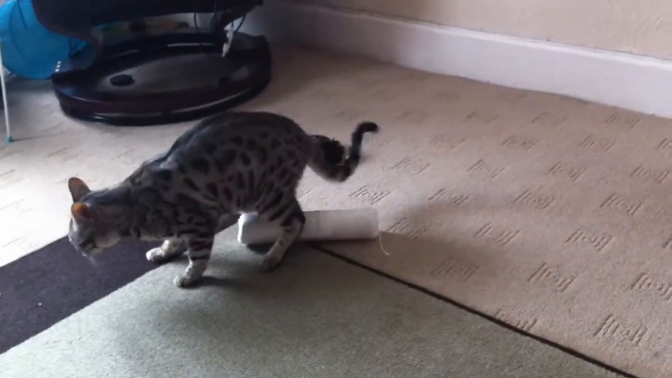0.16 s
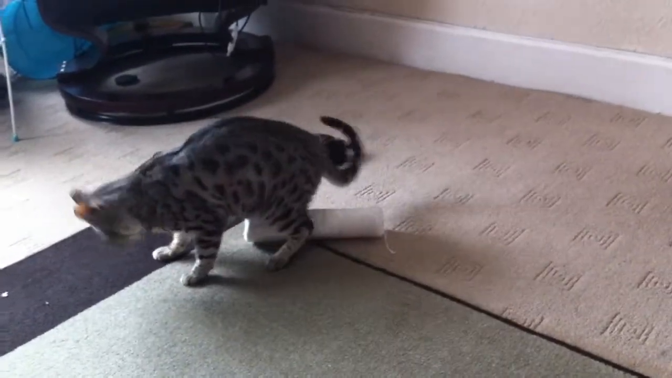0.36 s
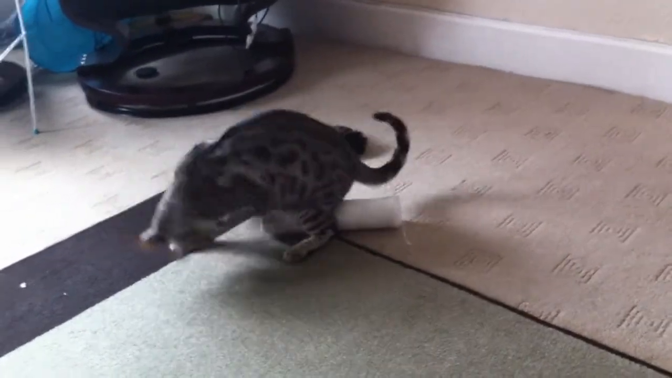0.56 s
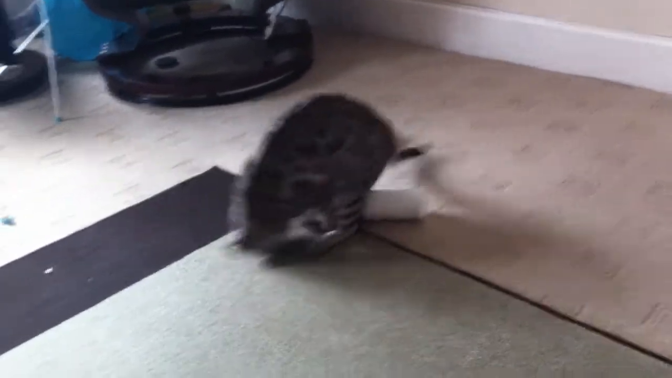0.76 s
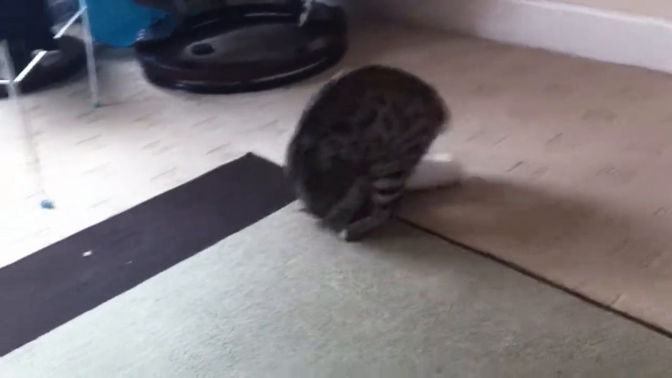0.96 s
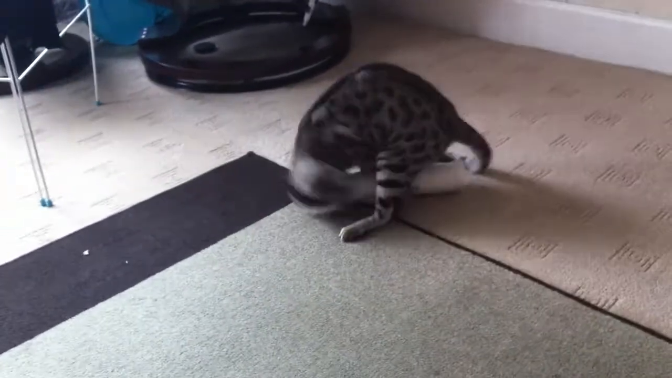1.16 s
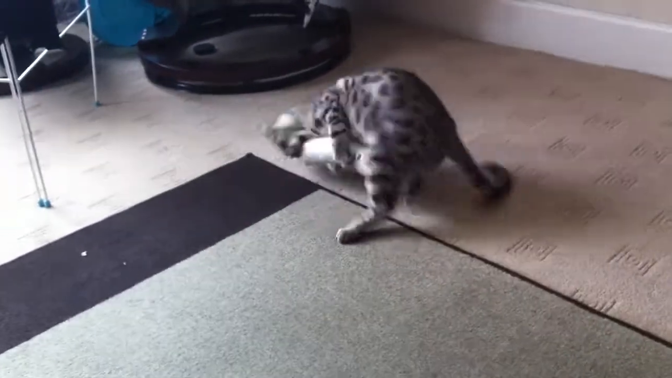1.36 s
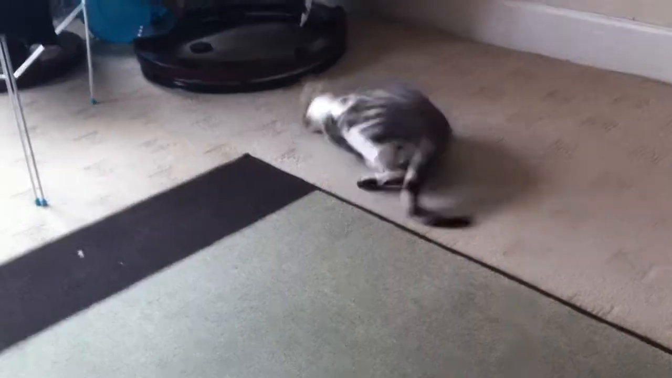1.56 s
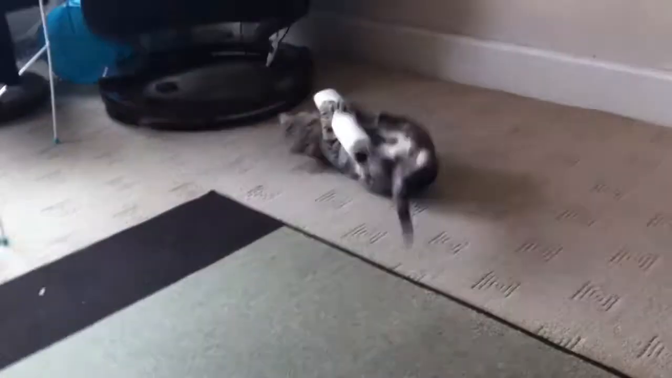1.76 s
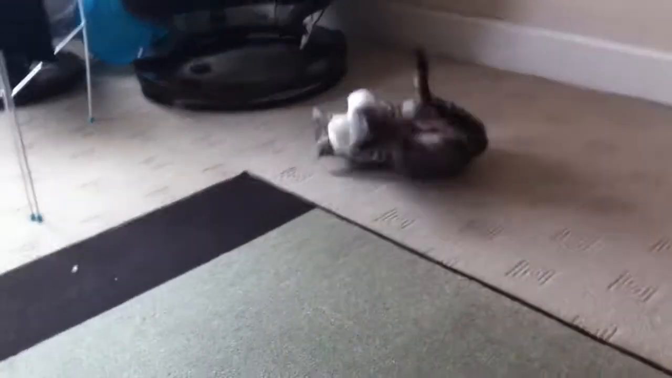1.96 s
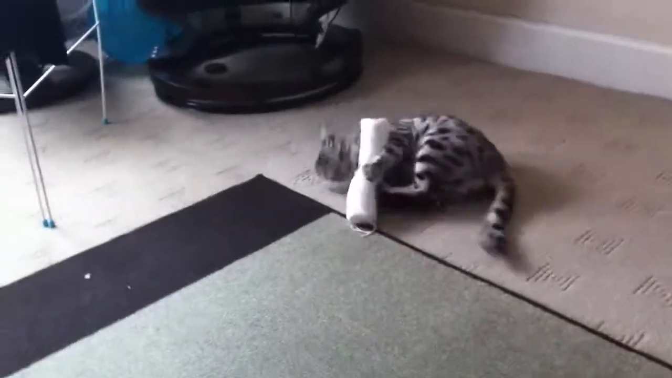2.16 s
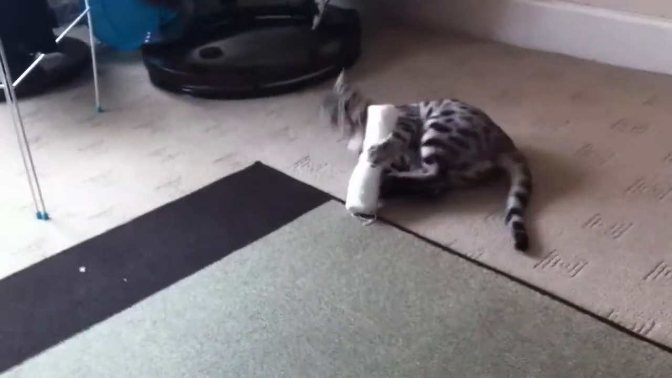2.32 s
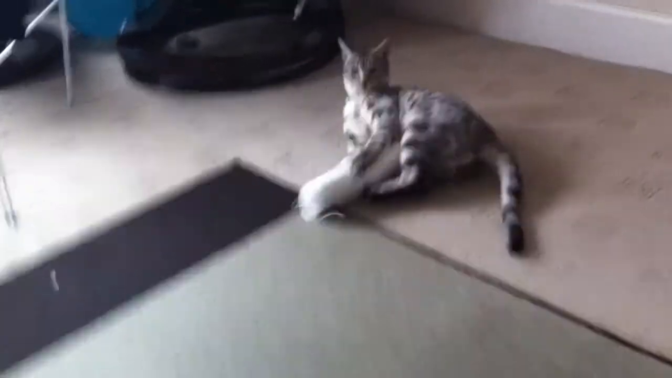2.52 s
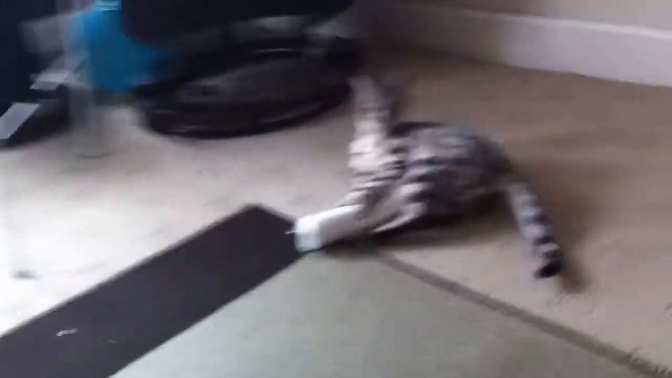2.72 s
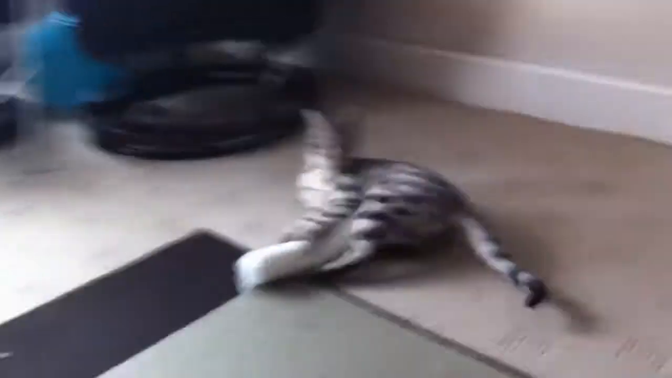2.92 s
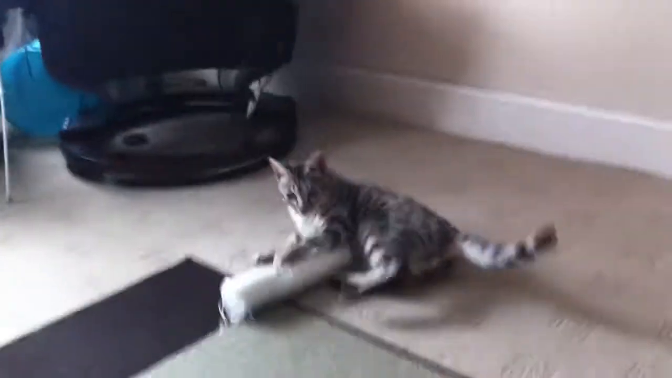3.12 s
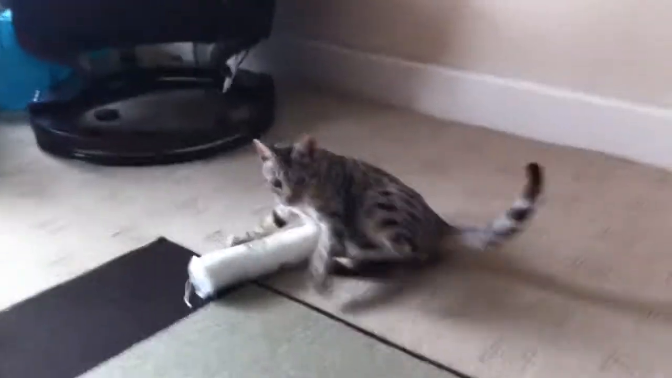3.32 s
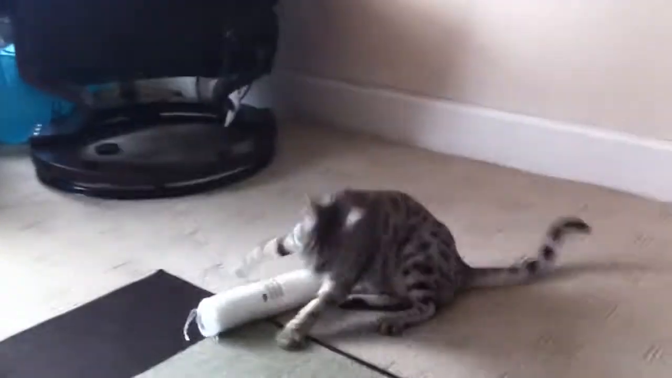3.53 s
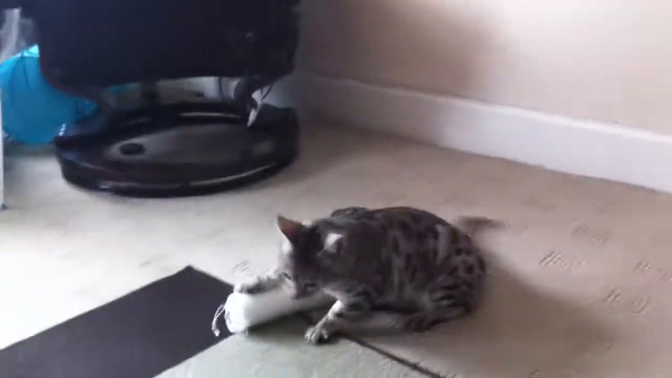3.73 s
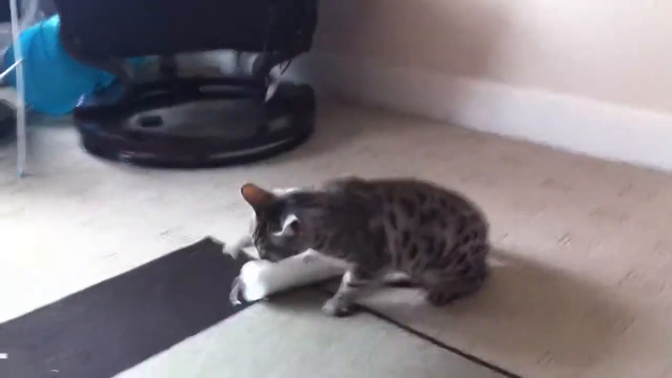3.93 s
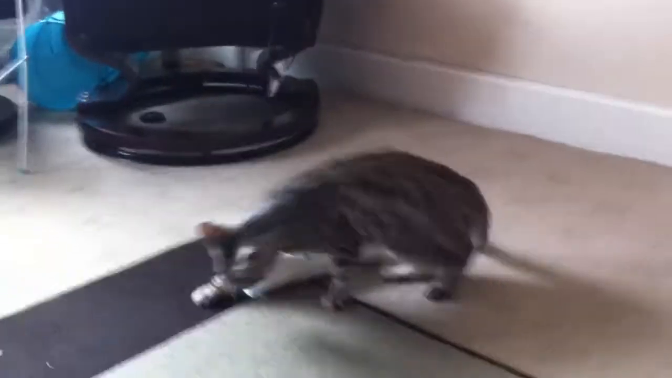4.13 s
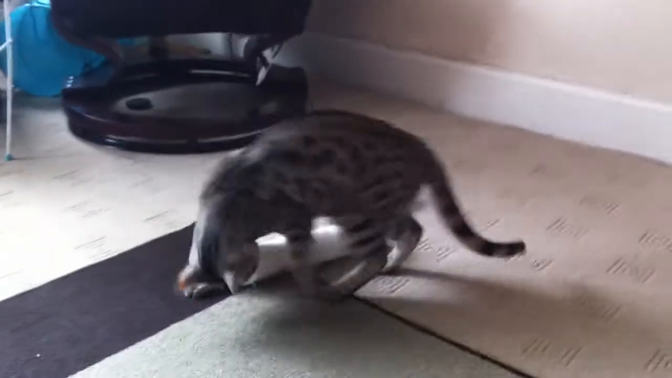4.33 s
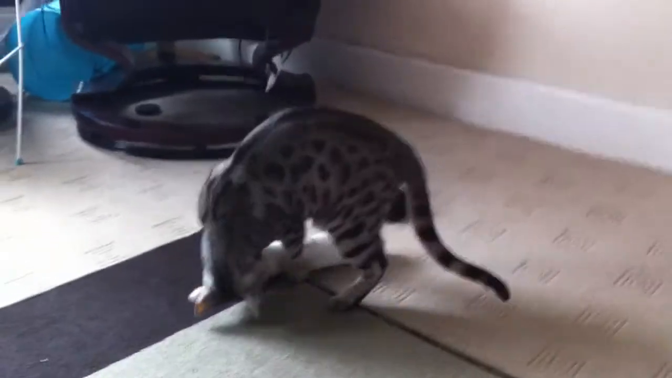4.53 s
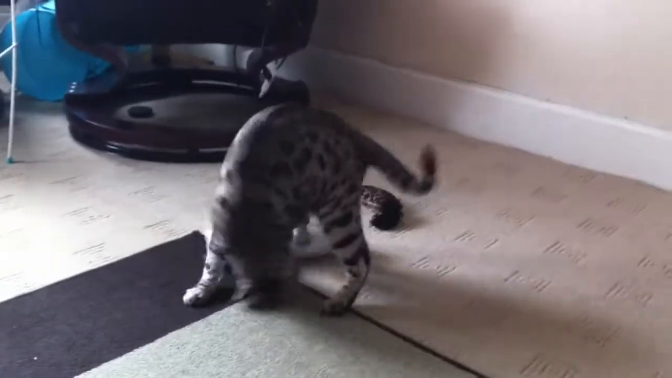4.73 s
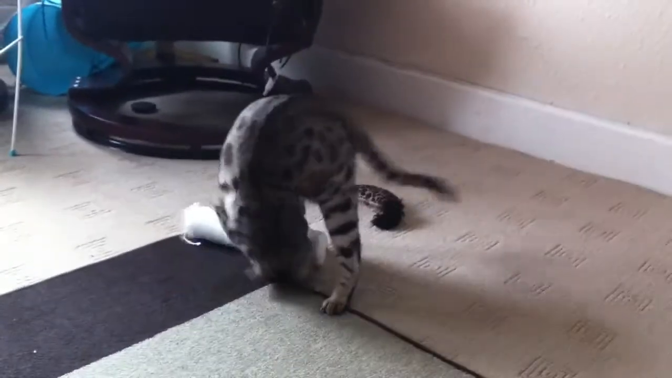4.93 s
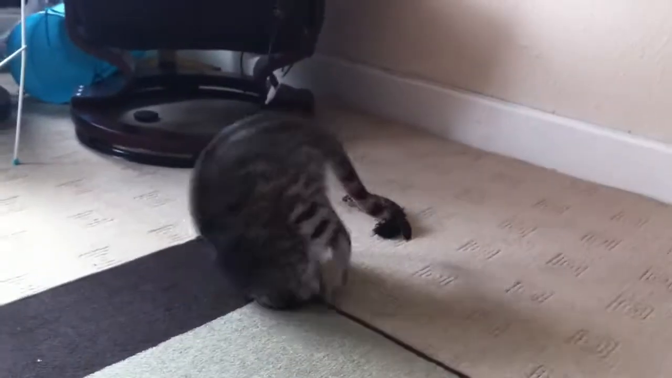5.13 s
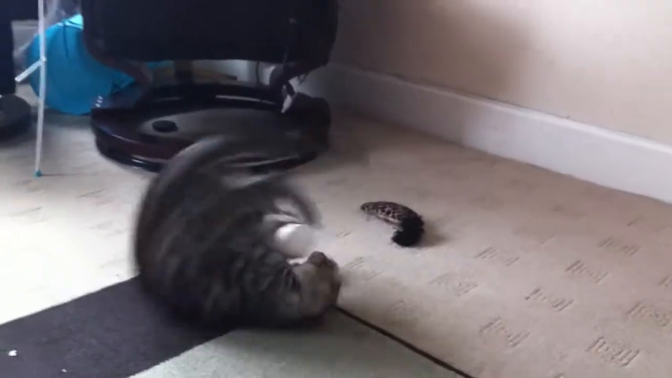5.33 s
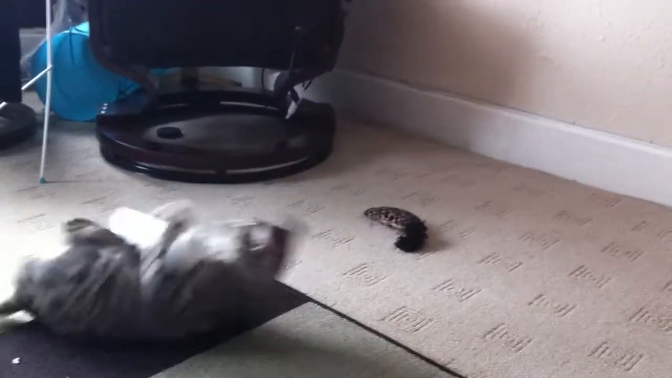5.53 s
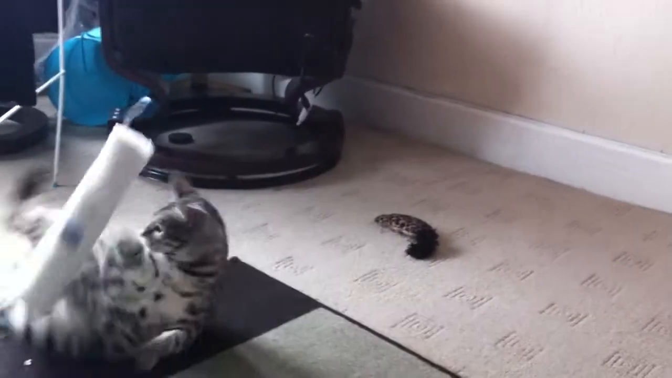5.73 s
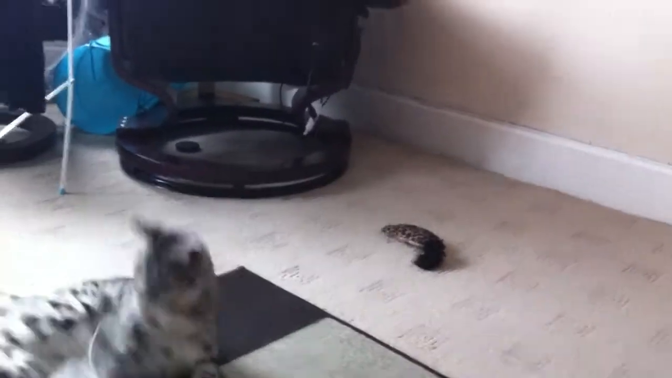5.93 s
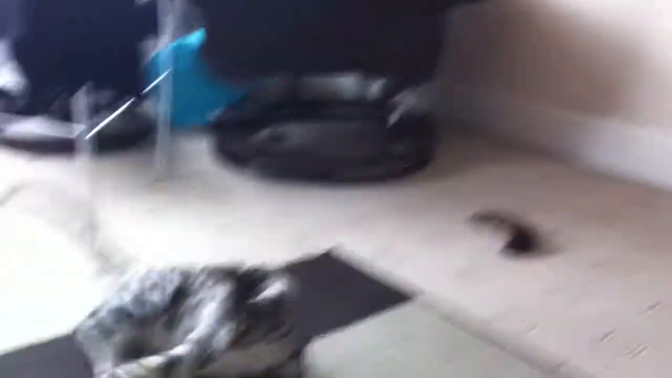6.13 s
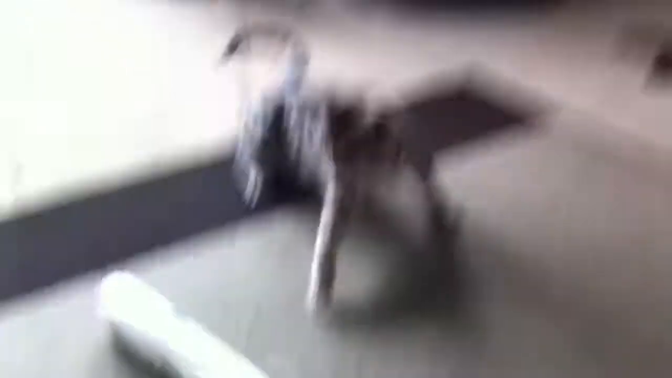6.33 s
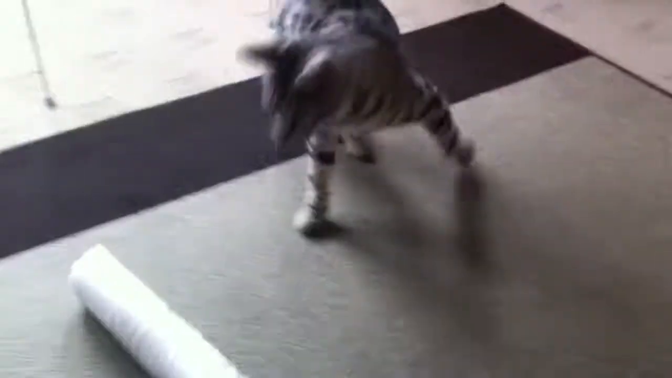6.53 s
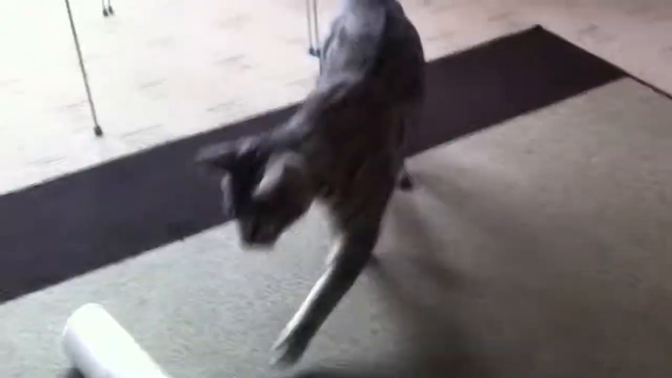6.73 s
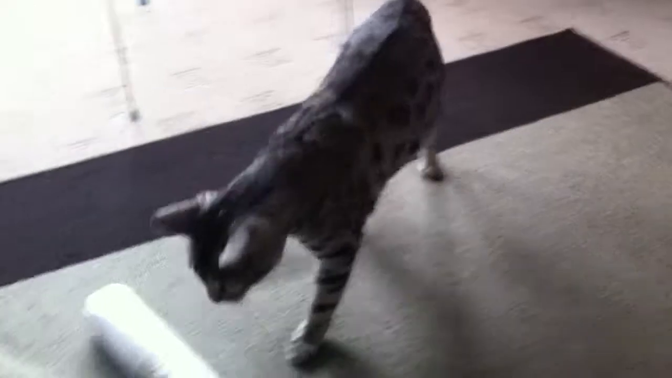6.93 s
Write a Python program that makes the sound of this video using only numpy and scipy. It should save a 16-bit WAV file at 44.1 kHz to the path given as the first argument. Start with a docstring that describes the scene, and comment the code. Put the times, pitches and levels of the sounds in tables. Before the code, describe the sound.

A cat wrestles a light, plastic-wrapped roll on the floor of a small room, with a short echo and faint steady hiss. Soft rubbing on carpet begins at about 0.5 seconds and builds with crinkling paw strokes. The loudest moment comes around 1.3 seconds, with sharp wrapper snaps, a thud and a short hollow knock. Scuffing, crinkles, snaps and soft bumps continue unevenly until just after 3 seconds. A quieter stretch follows, with light rustles, small bumps and a very faint plastic squeak near 3.5 seconds. From 4.5 seconds the raking and rubbing pick up again, with dull thuds of body and paws. A strong flurry of snaps, crinkles, thumps and hollow knocks runs from about 5.4 to 6.2 seconds. Lighter scuffs and a few small snaps carry on to the end at about 7 seconds.

```python
"""Cat wrestling a wrapped roll

A cat wrestles a light, plastic-wrapped roll in a small room, drifting from the carpet onto a mat.
Fur and wrapper rub over the floor, paws rake the wrapper in short crinkling strokes, and claws and
teeth make it snap. Body and roll thud on the floor, and the hollow roll knocks.
The walls echo briefly, over a faint steady room noise."""
import sys
import numpy as np
from scipy import signal
from scipy.fft import rfft, irfft, next_fast_len
from scipy.io import wavfile

SR = 44100
rng = np.random.default_rng(int(sys.argv[2]) if len(sys.argv) > 2 else 0)


def wav_out(sig):
    """Save sig, one row per channel (or a flat mono array), as 16-bit PCM at SR to the path in sys.argv[1]."""
    wavfile.write(sys.argv[1], SR, np.round(np.clip(np.atleast_2d(sig).T, -1, 1) * 32767).astype(np.int16))


N = 311787
TIME = np.arange(N) / SR


def gain(db):
    """Turn decibels into a number to multiply by."""
    return 10 ** (np.asarray(db) / 20)


def unit(x):
    """Scale x to an average (rms) level of 1."""
    return x / np.sqrt(np.mean(x ** 2) + 1e-20)


def tone(x, hz, db):
    """Turn each frequency in x up or down along a curve of decibels."""
    size = next_fast_len(len(x))
    bin_hz = np.maximum(np.arange(size // 2 + 1) * SR / size, 1)
    curve = gain(np.interp(np.log(bin_hz), np.log(hz), db))
    return irfft(rfft(x, size) * curve, size)[:len(x)]


def colour(x, points):
    """Shape x with (Hz, dB) points, then bring its average level to 1."""
    return unit(tone(x, *np.transpose(points)))


def add(track, start, sound):
    """Mix a sound into the track at a time in seconds."""
    i = max(int(start * SR), 0)
    part = sound[:max(N - i, 0)]
    track[i:i + len(part)] += part


def wander(rate):
    """A random curve, about 1 in size, that takes a new direction `rate` times a second."""
    return unit(np.interp(TIME * rate, np.arange(4096), rng.standard_normal(4096)))


def grains(spread_db):
    """Countless tiny slips of fibres and creases: most are faint, a few stand out."""
    sizes = gain(spread_db * np.minimum(rng.exponential(size=N), 7))
    return unit(rng.standard_normal(N) * sizes)


def die_away(t, t60):
    """A fade that drops by 60 dB every t60 seconds."""
    return np.exp(-np.log(1000) * t / t60)


def ring(t, hz, t60):
    """One note, struck at t = 0 and dying away."""
    return np.sin(2 * np.pi * hz * t) * die_away(t, t60)


# The tone of the steady room noise. Each row: frequency in Hz, relative level in dB.
ROOM_NOISE_TONE = [(15, -37), (25, -13), (75, -22), (104, -13.5), (129, -9.5), (215, 1), (253, -10),
                   (289, -3), (340, -17), (399, -10.5), (598, -14), (1050, -13), (1170, -14.5), (6380, -20),
                   (15500, -24)]

def room_noise(level_db):
    """A faint low murmur under an even hiss."""
    return colour(rng.standard_normal(N), ROOM_NOISE_TONE) * gain(level_db)


# How the room echoes. Each row: frequency in Hz, seconds to fade by 60 dB,
# energy in dB compared with the direct sound.
ECHO_BANDS = [(121, 0.86, -8), (420, 0.4, -3), (1000, 0.36, -5), (2490, 0.35, -5.5), (5500, 0.43, -9),
              (13600, 0.26, -5.5)]

def echoes(gap_s, early_db, early_s):
    """The echo from one spot: early bounces thicken into a short tail whose bass lasts longest."""
    t = np.arange(SR // 2) / SR
    hz, t60, echo_db = np.transpose(ECHO_BANDS)
    bounces = rng.standard_normal(len(t)) * (rng.random(len(t)) < .02)
    early = bounces * gain(early_db) * np.exp(-t / early_s)
    spectrum = rfft(rng.standard_normal(len(t)) + early)
    bin_hz = np.maximum(np.arange(len(spectrum)) * SR / len(t), 1)
    band_position = np.interp(np.log(bin_hz), np.log(hz), np.arange(len(hz)))
    arrival = np.clip(t / gap_s - 1, 0, 1)  # silent until the first bounce comes back
    echo = np.zeros(len(t))
    for k in range(len(hz)):
        decay = die_away(t, t60[k]) * arrival
        band = irfft(spectrum * np.maximum(1 - np.abs(band_position - k), 0), len(t))
        echo += gain(echo_db[k]) * band * decay / np.sqrt(np.sum(decay ** 2))
    return echo


def room(x, stretches):
    """The cat keeps moving, so each stretch of play gets its own pattern of echoes."""
    out, step = x.copy(), N // stretches + 1
    for i in range(0, N, step):
        echo = echoes(gap_s=0.0029, early_db=8.0, early_s=0.011)
        add(out, i / SR, signal.fftconvolve(x[i:i + step], echo))
    return out


def low_cut(x, corner_hz):
    """Cut away the deep bass, as the microphone does."""
    return signal.sosfilt(signal.butter(3, corner_hz, "high", fs=SR, output="sos"), x)


# The tone of each floor. Each row: frequency in Hz, change on the carpet in dB, change on the mat in dB.
FLOOR_TONE = [(400, -1, -0.5), (910, 0.5, -1), (2510, -1.5, -2.5), (3520, -4.5, 1), (4980, 0.5, -2.5),
              (8950, -5, -2), (11700, -1, -4.5), (16000, -3, 1.5)]
# The drift onto the mat. Each row: time in seconds, share of the play on the mat from 0 to 1.
MAT_SHARE = [(2.6, 0), (3.6, 0.94)]

def on_floor(x):
    """Soft carpet and flat mat each change the tone of what scrapes over them."""
    hz, carpet_db, mat_db = np.transpose(FLOOR_TONE)
    on_mat = np.interp(TIME, *np.transpose(MAT_SHARE))
    return (1 - on_mat) * tone(x, hz, carpet_db) + on_mat * tone(x, hz, mat_db)


# Slow rubbing, one list for each bout of play.
# Each row: time in seconds, relative level of the low rustle in dB, and of the hiss in dB.
RUB_BOUTS = [
    [(0.5, -68.5, -71.5), (0.77, -64, -72), (0.906, -59.5, -65), (1.188, -49.5, -56.5), (1.5, -63, -68)],
    [(1.55, -57, -54.5), (2.102, -52, -52), (2.256, -63, -58.5), (2.576, -57.5, -54.5), (2.9, -64.5, -65.5)],
    [(3.0, -61, -74), (3.192, -64, -64), (3.33, -67.5, -69), (4.304, -76.5, -71), (4.45, -70, -69.5)],
    [(4.55, -64, -69), (4.67, -60, -72), (4.914, -59.5, -63), (5.75, -59, -59), (5.96, -79, -75)],
    [(6.05, -78, -87), (6.142, -65, -66), (6.22, -55.5, -62), (6.694, -64, -67), (7.07, -65.5, -71.5)],
]
# The tones of the rustle and the hiss. Each row: frequency in Hz, relative level in dB.
RUSTLE_TONE = [(60, -38), (130, -7), (250, 3), (500, 4), (1000, 3.5), (2000, 5), (3000, -1), (5000, -24)]
HISS_TONE = [(1500, -6), (3000, -3.5), (4500, -2.5), (6200, -3.5), (8500, -7.5), (12000, -12.5),
             (16000, -14)]

def rubbing(rustle_gain_db, hiss_gain_db):
    """Fur and roll drag over the carpet fibres, catching and letting go."""
    times, rustle_db, hiss_db = np.concatenate(RUB_BOUTS).T
    rustle_level = gain(rustle_gain_db + np.interp(TIME, times, rustle_db, left=-120))
    hiss_level = gain(hiss_gain_db + np.interp(TIME, times, hiss_db, left=-120))
    catch = gain(1.5 * wander(rate=22) + 1.3 * wander(rate=60) + 1.1 * wander(rate=280))
    judder = unit(gain(2.2 * wander(rate=130)))  # the roll hops over the tufts
    rustle = colour(grains(spread_db=2.5), RUSTLE_TONE) * rustle_level
    hiss = colour(grains(spread_db=4.0), HISS_TONE) * hiss_level
    return (rustle * judder + hiss) * catch


# One thin squeak of plastic: start in seconds, length in seconds, level in dB, pitch in Hz.
PLASTIC_SQUEAK = (3.505, .095, -71, 6200)

def squeak(waver):
    """The wrapper sticks and slips for a moment on an unsteady pitch."""
    start, length, db, hz = PLASTIC_SQUEAK
    swell = np.sin(np.pi * np.clip((TIME - start) / length, 0, 1))
    pitch_hz = hz * (1 + waver * wander(rate=450))
    return gain(db) * swell * np.sin(2 * np.pi * np.cumsum(pitch_hz) / SR)


# Soft blows of paws and body on the floor. Each row: start in seconds, level in dB, rough pitch in Hz.
FLOOR_THUDS = [(.850, -51, 222), (1.090, -43, 258), (1.278, -32, 335), (1.281, -23, 634),
               (1.936, -40.5, 334), (2.164, -44.5, 278), (2.205, -50.5, 161), (3.04, -41.5, 424),
               (3.303, -47.5, 395), (3.612, -52.5, 184), (3.782, -50, 270), (4.769, -41, 420),
               (5.045, -44, 123), (5.096, -50, 129), (5.167, -46, 230), (5.452, -45, 525),
               (5.583, -48.5, 147), (6.004, -41, 625), (6.036, -45.5, 323), (6.123, -35.5, 330),
               (6.124, -43, 129), (6.325, -53, 173)]

def thuds(contact_s):
    """The carpet cushions each blow into a puff of dull noise."""
    t = np.arange(SR // 3) / SR
    out = np.zeros(N)
    for start, db, hz in FLOOR_THUDS:
        t60 = .09 * (300 / hz) ** 0.36  # heavier, lower blows die away more slowly
        dull_tone = [(hz / 4, -24), (hz / 2, -6), (hz, 0), (hz * 2, -9), (hz * 8, -50)]
        noise = colour(rng.standard_normal(len(t)), dull_tone)
        puff = noise * die_away(t, t60) * (1 - np.exp(-t / contact_s))
        add(out, start, gain(db) * puff / np.abs(puff).max())
    return out


# Knocks on the roll. Each row: start in seconds, level in dB, pitch in Hz, seconds to fade by 60 dB.
ROLL_KNOCKS = [(0.956, -29, 353, 0.013), (1.359, -28, 500, 0.026), (2.317, -49.5, 250, 0.042),
               (5.71, -43, 253.6, 0.11), (6.0064, -34, 484, 0.044)]

def knocks(contact_s):
    """The hollow roll gives a short, round note whose pitch depends on where it is struck and held."""
    t = np.arange(SR // 3) / SR
    out = np.zeros(N)
    for start, db, hz, t60 in ROLL_KNOCKS:
        add(out, start, gain(db) * ring(t, hz, t60) * (1 - np.exp(-t / contact_s)))
    return out


# The tone of crinkling plastic. Each row: frequency in Hz, relative level in dB.
CRINKLE_TONE = [(50, -53), (130, -9), (300, -6), (700, 0), (1300, -0.5), (2100, 1.5), (3000, -2.5),
                (5200, -2.5), (8500, -8), (12000, -13), (16000, -22)]
# Quick paw strokes over the wrapper. Each row: start in seconds, level in dB,
# fade time in seconds, brightness (extra treble over bass) in dB.
PAW_STROKES = [(0.554, -63, 0.027, -14), (0.72, -49, 0.067, -15), (0.848, -40.5, 0.019, -6.5),
               (.992, -44.5, 0.075, -3), (1.045, -43.5, 0.013, 1), (1.089, -46.5, .018, -7),
               (1.371, -40, 0.027, -6.5), (1.531, -43.5, 0.051, -4.5), (1.665, -51.5, 0.018, -2),
               (1.931, -41.5, 0.046, 8), (2.155, -41.5, 0.043, -4), (2.489, -48, 0.07, 2),
               (2.622, -45, 0.046, -6.5), (3.042, -43, 0.023, -7), (3.122, -43.5, .02, -7),
               (3.232, -56, 0.048, 2), (3.300, -56.5, 0.032, -1), (3.773, -47, 0.025, 4),
               (4.008, -64.5, 0.023, 11), (4.213, -61, 0.035, -1), (4.499, -51, 0.066, -6.5),
               (4.696, -52, 0.12, -7), (4.818, -50.5, .05, -5), (4.885, -52.5, 0.032, -8),
               (5.022, -47, 0.12, -9), (5.160, -44.5, 0.039, -13), (5.452, -45, 0.067, -2),
               (5.640, -51, 0.066, 1), (5.711, -47, 0.064, -1.5), (5.766, -41.5, 0.026, 9),
               (5.788, -38.5, 0.016, 3), (6.042, -40, 0.041, 6), (6.122, -32, 0.015, -0.5),
               (6.156, -41.5, 0.042, -6.5), (6.437, -54, 0.016, 0), (6.58, -59.5, .05, -10),
               (6.795, -59, 0.022, -4), (6.894, -59.5, 0.055, -2)]

def paw_strokes(split_hz):
    """Each stroke swells and fades as a shower of crinkles, with its own brightness."""
    crinkle = colour(grains(spread_db=2.2), CRINKLE_TONE) * gain(1.8 * wander(rate=300))
    dull = signal.sosfilt(signal.butter(1, split_hz, fs=SR, output="sos"), crinkle)
    t = np.arange(SR // 2) / SR
    dull_level, bright_level = np.zeros(N), np.zeros(N)
    for start, db, fade_s, bright_db in PAW_STROKES:
        rise_s = 0.0051 * .5 ** ((db + 42.5) / 23)  # a harder stroke takes hold sooner
        swell = np.sqrt(np.minimum(t / rise_s, 1))
        shape = gain(db) * swell * np.exp(-np.maximum(t - rise_s, 0) / fade_s)
        add(dull_level, start, shape * gain(-bright_db / 2))
        add(bright_level, start, shape * gain(bright_db / 2))
    return dull_level * dull + bright_level * (crinkle - dull)


def chance_snaps(per_second, over_rub_db, usual_hz, edge_db):
    """Handling the roll sets off faint snaps, louder as the rubbing grows. Returns rows for snaps()."""
    times, rustle_db, hiss_db = np.concatenate(RUB_BOUTS).T
    gap, size, pitch = rng.standard_normal((200, 3)).T
    starts = times[0] + np.cumsum(np.exp(gap / 2 - 1 / 8)) / per_second
    rub_db = np.interp(starts, times, (rustle_db + hiss_db) / 2)
    levels_db = rub_db + over_rub_db + 2 * np.clip(size, -2, 2)
    pitches_hz = usual_hz * 2 ** (0.47 * np.clip(pitch, -2, 2))  # up to about an octave either way
    return [(start, db, hz, edge_db) for start, db, hz in zip(starts, levels_db, pitches_hz)]


# Loud snaps of the wrapper under claws and teeth. Each row: start in seconds, level in dB,
# pitch in Hz, level of the sharp edge in dB compared with the main swing.
WRAPPER_SNAPS = [(.753, -37, 1400, 2), (0.9553, -33.5, 1440, -4), (1.1814, -25, 1590, -6),
                 (1.277, -20, 4700, -12), (1.2787, -11, 1530, -19), (1.3588, -16, 4770, -27),
                 (2.114, -38, 2000, -2), (2.1625, -32.5, 1490, -14), (2.1635, -28.5, 4560, -15),
                 (2.3373, -43.5, 5000, 9), (2.4964, -35, 1840, 2), (2.539, -35, 3400, 4),
                 (2.6229, -34, 1490, -13), (2.634, -35.5, 1380, 3), (2.784, -36, 2940, 0),
                 (2.9373, -35.5, 4950, -22), (3.0414, -24, 1090, -18), (3.0413, -20, 3550, -24),
                 (3.125, -30.5, 1910, 10.5), (4.525, -46, 4000, 9), (4.6064, -39, 3880, -16),
                 (4.6986, -35, 3780, -15), (5.1362, -33, 1450, 1.5), (5.4535, -20.5, 2240, 1.5),
                 (5.7638, -21.5, 4560, 8.5), (6.0797, -24.5, 3450, -9), (6.1265, -20.5, 4050, -3),
                 (6.807, -48, 4440, 6), (6.8974, -39, 3240, -8), (6.971, -37.5, 1680, -11)]

def snaps(cycles, edge_hz, edge_t60, crackle_db, crackle_s):
    """A patch of wrapper buckles in one or two swings, with a sharp edge and a brief crackle."""
    t = np.arange(SR // 25) / SR
    out = np.zeros(N)
    faint = chance_snaps(per_second=14, over_rub_db=13, usual_hz=2300, edge_db=-12)
    edge = np.gradient(ring(t, edge_hz, edge_t60))
    edge /= np.abs(edge).max()
    for start, db, hz, edge_db in WRAPPER_SNAPS + faint:
        # a small patch is heard only through its quick changes, so it has no bass
        swing = np.gradient(t * ring(t, hz, cycles / hz))
        swing /= np.abs(swing).max()
        crackle = colour(rng.standard_normal(len(t)), CRINKLE_TONE) * np.exp(-t / crackle_s)
        add(out, start, gain(db) * (swing + gain(edge_db) * edge + gain(crackle_db) * crackle))
    return out


def scene():
    """The cat and the roll in the room, as one channel."""
    scuffs = rubbing(rustle_gain_db=-3, hiss_gain_db=-1) + paw_strokes(split_hz=970)
    scuffs += snaps(cycles=2.26, edge_hz=5600, edge_t60=0.00092, crackle_db=-15, crackle_s=0.0042)
    play = on_floor(scuffs) + squeak(waver=0.015) + thuds(contact_s=0.0019) + knocks(contact_s=0.00045)
    play_in_room = room(low_cut(play, corner_hz=123), stretches=22)
    return (play_in_room + room_noise(level_db=-68.5))[None]


def record(dry):
    """Cut away the highest treble, above 15900 Hz."""
    return signal.sosfilt(signal.ellip(10, .2, 65, 15900, fs=SR, output="sos"), dry)


dry = scene()
out = record(dry)
wav_out(out)
```